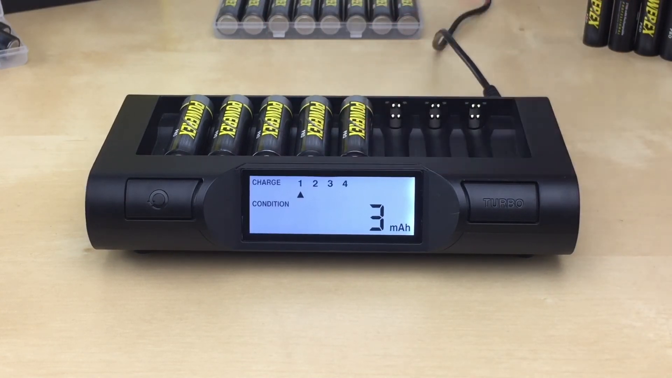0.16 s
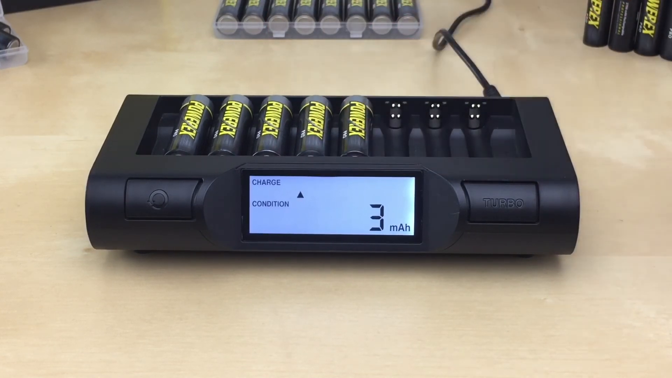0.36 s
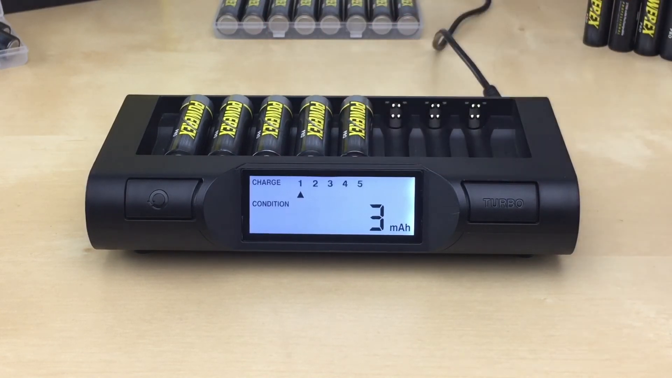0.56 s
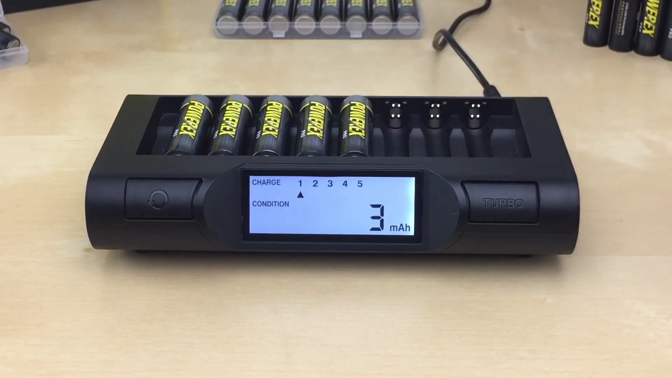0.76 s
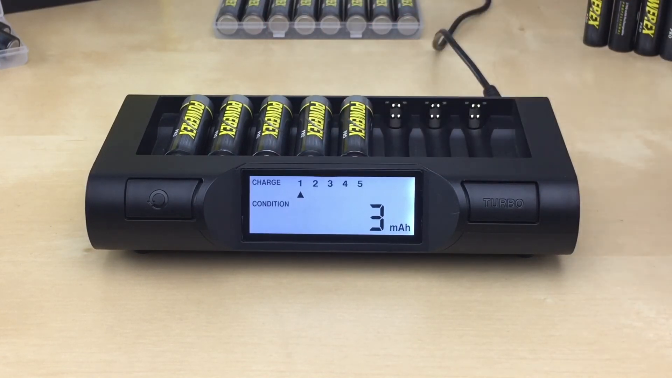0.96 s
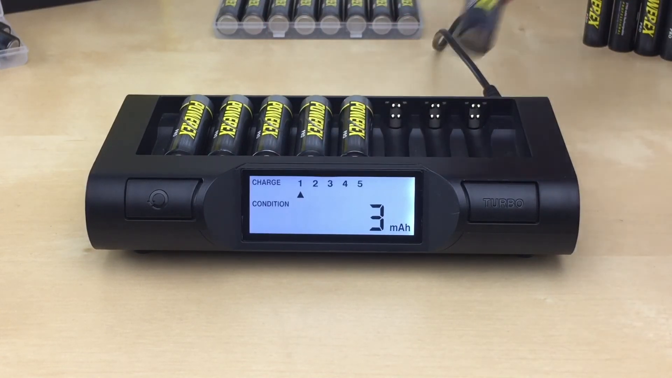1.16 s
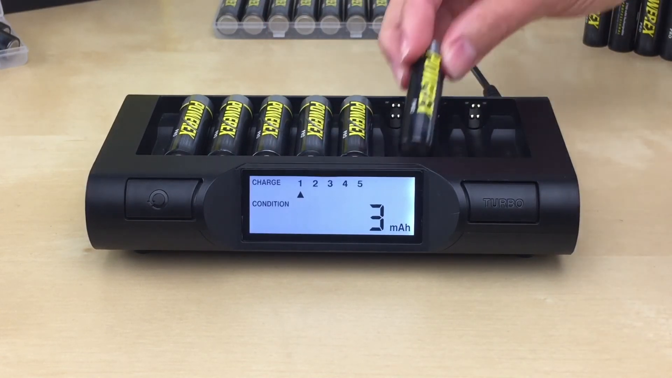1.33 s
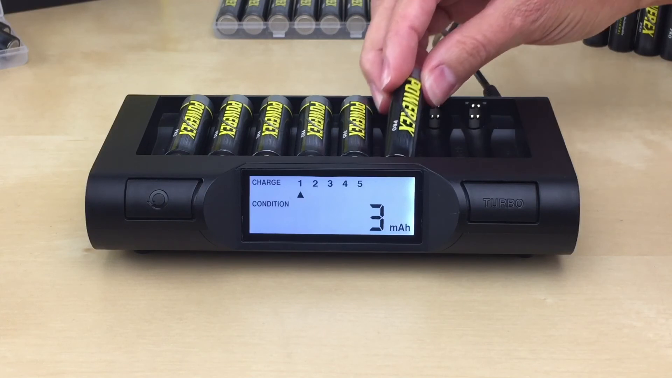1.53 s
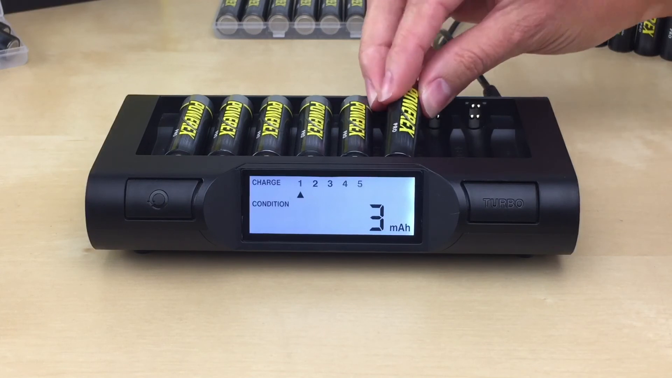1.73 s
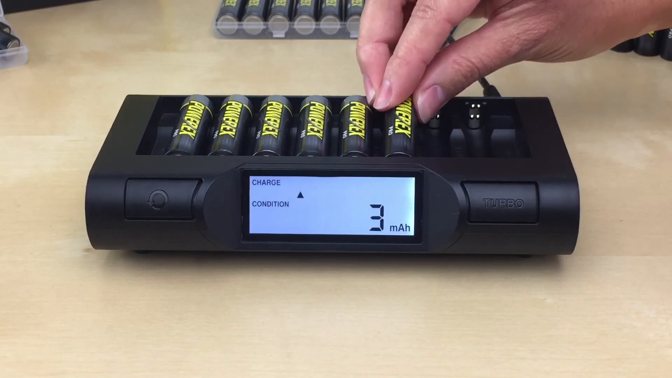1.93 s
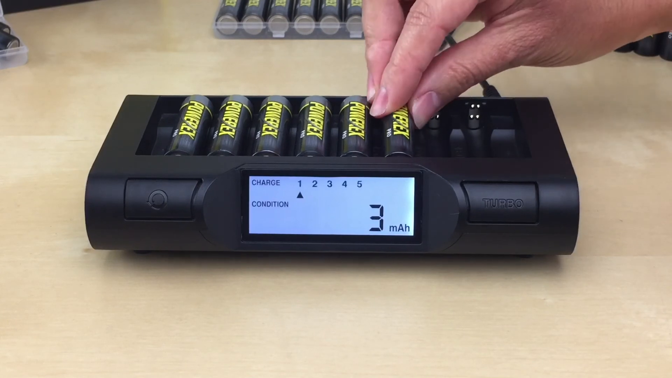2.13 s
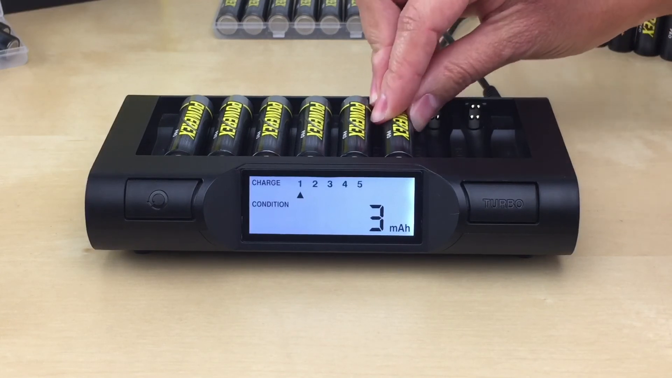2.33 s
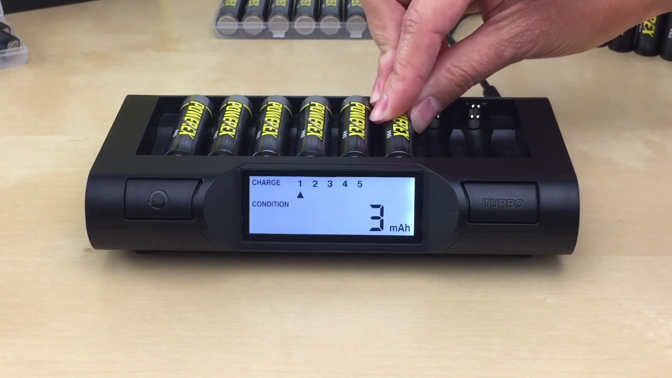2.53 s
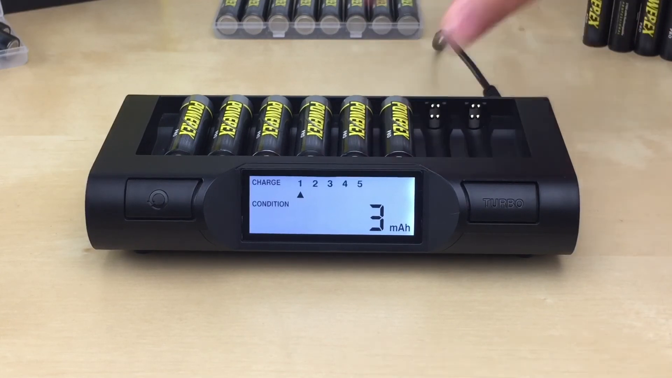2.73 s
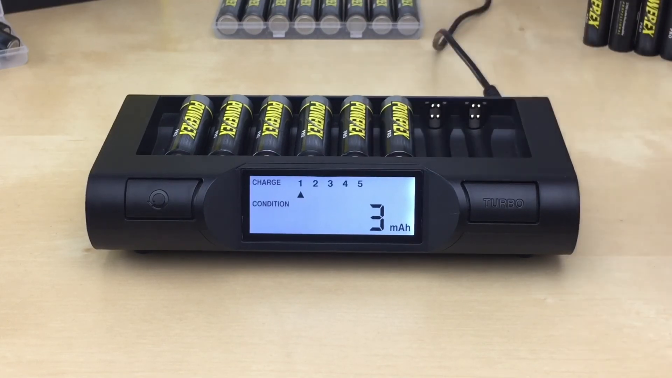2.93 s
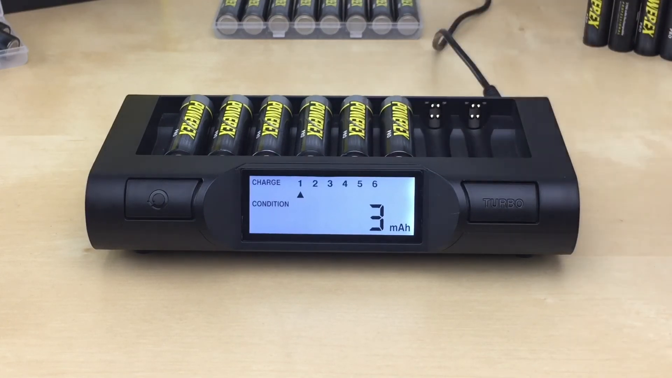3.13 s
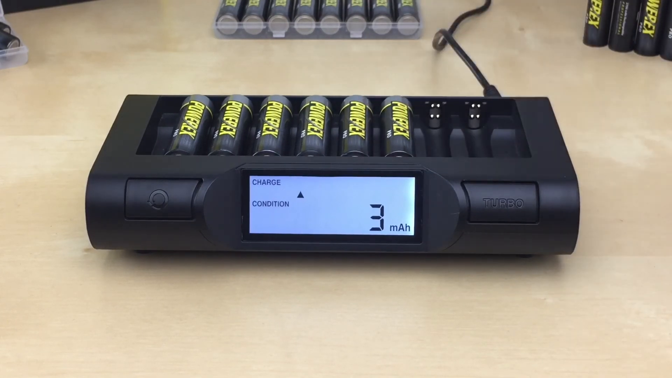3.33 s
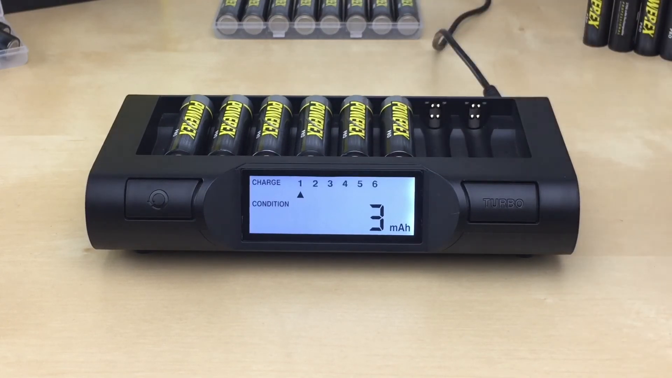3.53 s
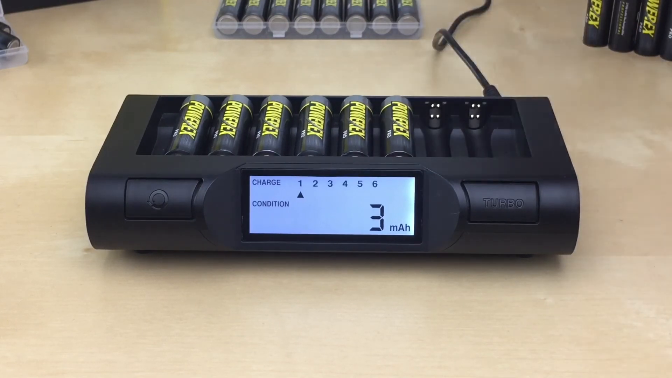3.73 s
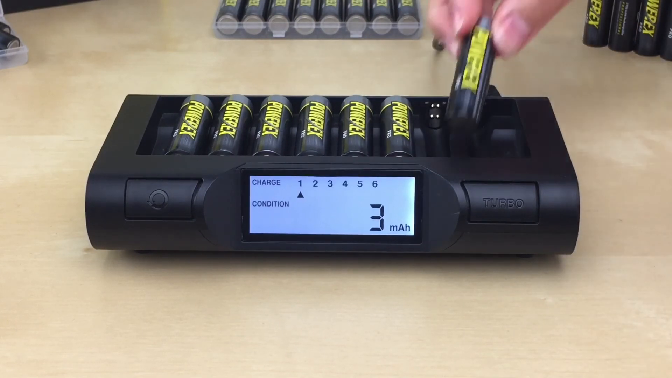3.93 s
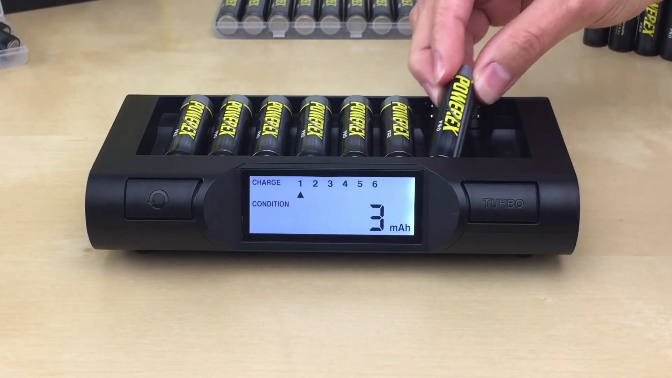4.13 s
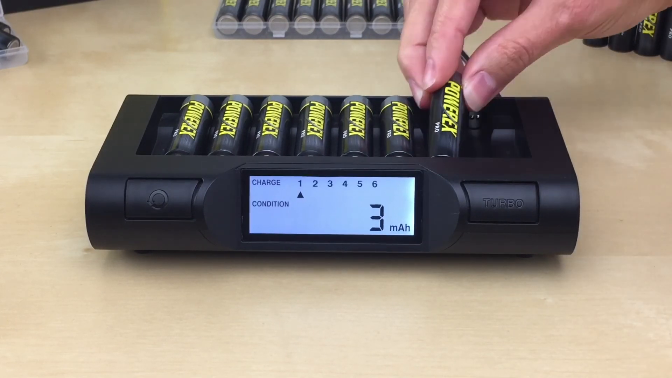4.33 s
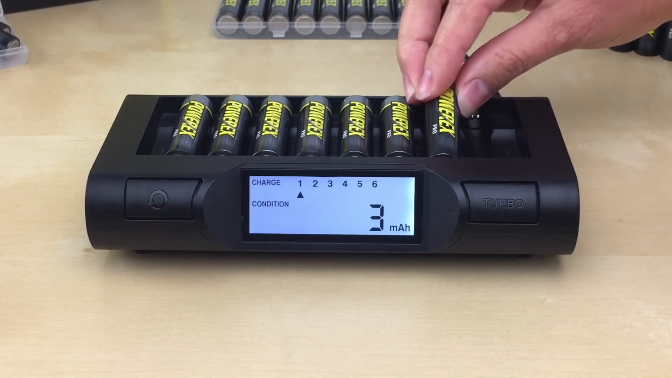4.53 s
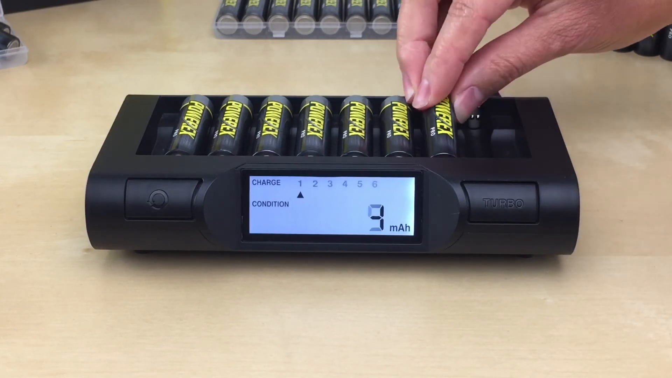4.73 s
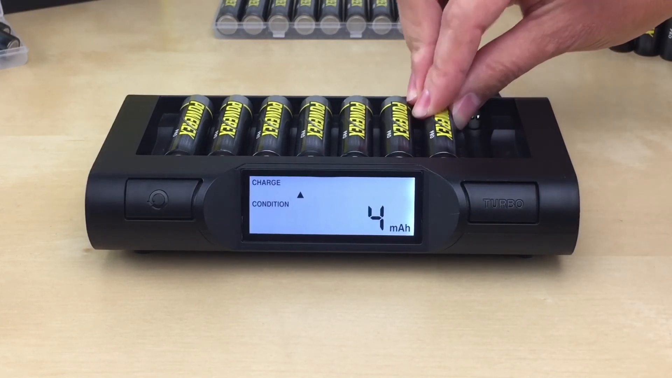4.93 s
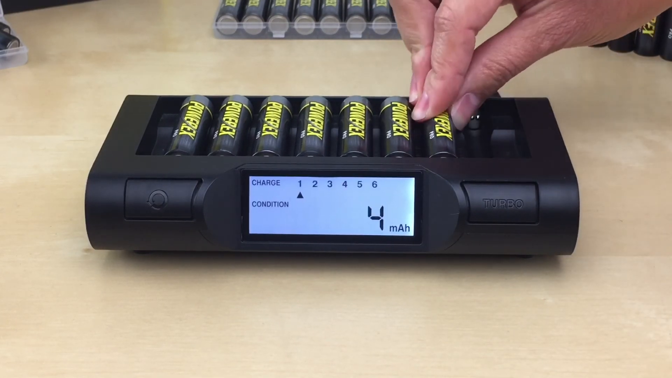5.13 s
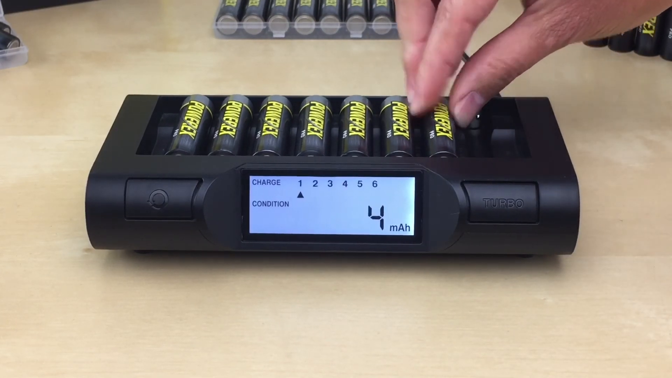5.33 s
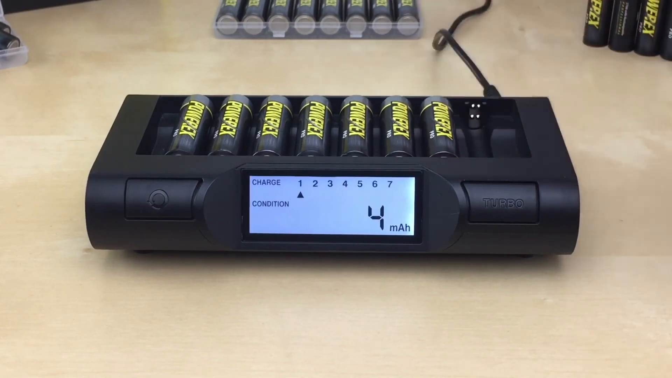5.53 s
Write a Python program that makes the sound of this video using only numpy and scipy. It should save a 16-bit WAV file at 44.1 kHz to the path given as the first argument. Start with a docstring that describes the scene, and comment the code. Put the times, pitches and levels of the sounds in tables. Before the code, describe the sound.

Close by in a quiet room, small batteries are pushed into a plastic charger on a wooden desk. After one sharp opening click, a battery knocks into its slot, rattles briefly and snaps past the spring contact. Following a pause, another goes in the same way, with a tiny metallic ping. The charger's cooling fan hums and whines faintly throughout.

```python
"""Sharp clicks and small thuds, close by in a quiet room: batteries pushed one by one into a plastic
charger on a wooden desk. Each cell knocks into its slot, scrapes past the spring contact and snaps
home; shell and spring ring with the clicks, the hollow case and the desk with the knocks.
Behind them the charger's little cooling fan hums and whines throughout, the whine swelling while
a hand rests over it, and the charging coils sing faintly."""
import sys
import numpy as np
from scipy import signal
from scipy.fft import rfft, irfft
from scipy.io import wavfile

SR = 44100
rng = np.random.default_rng(int(sys.argv[2]) if len(sys.argv) > 2 else 0)


def dump_mix(stems):
    """Bounce the given channels to the path in sys.argv[1] as a 16-bit WAV at rate SR."""
    frames = np.atleast_2d(stems).T  # one column per channel
    limited = np.clip(frames, -1, 1)  # hard clip at full scale
    pcm = np.round(limited * 32767).astype(np.int16)
    wavfile.write(sys.argv[1], SR, pcm)


N = 250488

# each cell's way into its slot, levels relative: landing t/s, rattle/dB, push start t/s, home t/s,
# friction at home/dB, spring ping/dB
CELLS = [(1.421, -28.5, 1.78, 2.275, -50.5, -46), (4.096, -39, 4.62, 5.009, -50.5, -35)]


def contact_clicks(shell_db, spring_db, edge_db):
    """A cell slips over the contacts: shell and spring ring, and each spot adds a note of its own."""
    # metal meets metal, levels relative: t/s, shell/dB, shell low cut/Hz, spring/dB, sharp edge/dB,
    # rise/ms, note f/Hz, note/dB
    contacts = [(0.159, -17.5, 1250, -20.5, -22.5, 0.075, 3370, -26),
                (1.422, -19, 950, -35, -54, 0.31, 3460, -33.5),
                (1.5112, -25, 800, -49, -64, 0.3, 3380, -54),
                (1.6156, -34.5, 800, -46.5, -36.5, 0.66, 10100, -52),
                (2.1540, -30, 500, -30, -23, 0.078, 7260, -36.5),
                (2.1566, -33, 500, -42, -34, .2, 4800, -37),
                (2.2740, -24.5, 550, -39.5, -37, 0.7, 4200, -43),
                (4.0950, -31.5, 700, -53, -66, .5, 2410, -42.5),
                (4.1912, -32.5, 1100, -37.5, -29.5, 0.13, 3900, -40),
                (4.6166, -33.5, 700, -45.5, -43, .5, 3000, -48),
                (4.8654, -40, 700, -35, -29.5, 1.5, 7140, -38), (4.984, -49, 705, -44, -62, 2.2, 6750, -50),
                (5.0044, -30.5, 600, -34, -41, 2.6, 4450, -40),
                (5.0140, -27, 500, -36.5, -47, 0.35, 3420, -40),
                (5.3784, -43, 700, -41.5, -28.5, .3, 6430, -43), (5.4, -58, 700, -52, -37, .3, 14900, -56)]
    # modes of the plastic shell and the metal spring: f/Hz, relative level/dB, t60/s
    shell_modes = [(597, -0.5, 0.024), (787, 10.5, 0.034), (855.5, 8, 0.019), (1050, 3.5, 0.016),
                   (1244, 5, 0.023), (1273, 4.5, 0.016), (1540, 1.5, 0.012), (1800, -1.5, 0.0085),
                   (2020, -6, 0.028), (2210, -3, 0.014), (2770, 1.5, 0.0018)]
    spring_modes = [(3030, -9, 0.02), (3640, -5.5, 0.023), (4476, 0.5, 0.014), (5420, 0, 0.0041),
                    (5800, 0, 0.0064), (6680, 1.5, 0.0039), (6900, 0, 0.0087), (7800, -4, 0.0029),
                    (9350, -0.5, 0.0023)]
    shell, spring, edge, notes = np.zeros((4, N))
    for s, shell_hit_db, low_cut_hz, spring_hit_db, edge_hit_db, rise_ms, note_hz, note_db in contacts:
        snap = chatter(rise_ms, spike_share=0.78)
        add(shell, s, from_db(shell_hit_db) * butter(snap, low_cut_hz, "high"))   # small, so little bass
        scrape = chatter(rise_ms, spike_share=0.1)
        add(spring, s, from_db(spring_hit_db) * scrape)
        add(edge, s, from_db(edge_hit_db) * scrape)
        add(notes, s, from_db(note_db) * metal_note(note_hz, rise_ms / 1000, t60=.014))
    plastic = from_db(shell_db) * body(shell, shell_modes)
    metal = from_db(spring_db) * butter(body(spring, spring_modes), 1200, "high")
    sizzle = from_db(edge_db) * butter(edge, (7600, 13500), "band")
    return plastic + metal + sizzle + notes


def chatter(rise_ms, spike_share):
    """Force of one contact: a spike, then a rattle of tiny impacts; a slow scrape loses the spike."""
    t_ms = np.linspace(0, 40, SR // 25)
    length_ms = 9.5 + 0.6 * rise_ms   # a slower contact rattles longer
    swell = (1 - np.exp(-t_ms / rise_ms)) * np.exp(-(t_ms / length_ms) ** 2)
    spectrum = rfft(rng.standard_normal(len(t_ms)) * swell)
    flat = spectrum / np.abs(spectrum)   # hard impacts carry all pitches evenly
    rattle = irfft(flat, len(t_ms)) * np.sqrt(swell)
    spike_energy = spike_share * np.exp(-rise_ms / 2)
    force = rattle * np.sqrt((1 - spike_energy) / np.sum(rattle ** 2))
    force[0] += np.sqrt(spike_energy)
    return force


def metal_note(hz, rise_s, t60):
    """A short metal ping that builds up as fast as the contact does."""
    t = np.arange(SR // 10) / SR
    return np.sin(2 * np.pi * hz * t) * (1 - np.exp(-t / rise_s)) * from_db(-60 * t / t60)


def spring_pings():
    """The loaded spring gives one longer note as a cell snaps home."""
    out = np.zeros(N)
    for _, _, _, home_s, _, ping_db in CELLS:
        add(out, home_s, from_db(ping_db) * metal_note(hz=4500, rise_s=0.0039, t60=0.049))
    return out


def desk_knocks(rub_db, rub_hz):
    """Knocks and friction pass through the hollow case and its rubber feet into the desk top."""
    # a cell knocks on the case, levels relative: t/s, desk ring/dB, overtones over that ring/dB,
    # thud on the feet/dB, rocking/dB, hollow clunk/dB
    cell_knocks = [(1.4219, -25.5, 1.5, -35, -59, -30.5), (1.513, -45, 12, -36.5, -52, -41.5),
                   (1.809, -43.5, 1.5, -50, -55, -48), (2.153, -35, -4.5, -36, -43, -34),
                   (2.274, -28.5, -6, -27.5, -35.5, -39), (4.096, -33.5, -11, -41, -56, -37),
                   (4.122, -51, 4, -50, -66, -41), (4.62, -40, -0.5, -41, -50, -40.5),
                   (5.003, -58.5, 6, -29.5, -38.5, -51)]
    # fingers nudge the charger: t/s, relative desk ring/dB
    nudges = [(0.110, -48), (1.618, -44.5), (2.100, -50), (2.364, -51), (2.726, -56), (4.181, -42),
              (4.344, -56), (4.851, -45), (5.113, -53.5), (5.416, -54.5)]
    # modes of the desk top, the case and the charger on its feet: f/Hz, relative level/dB, t60/s
    desk_modes = [(141.9, 4, 0.22), (214.8, -1, 0.41), (236.4, -18.5, 1), (262, -14, 0.28),
                  (340.5, -17.5, .16), (414, -19.5, 0.24)]
    case_modes = [(347, -9, 0.065), (440, -10.5, 0.065), (480, -5.5, 0.065), (583, -1.5, 0.097)]
    feet_modes = [(88.5, -4, 0.071), (119.7, 5, 0.053), (331, -15.5, 0.12)]
    hard_hz, soft_hz = 450, 227   # soft contacts shake only the low modes
    hard = [(*row, hard_hz) for row in cell_knocks]
    soft = [(s, db, -2, db - 5, db - 18, db - 12, soft_hz) for s, db in nudges]
    lowest, overtones, feet, rocking, case = np.zeros((5, N))
    for s, desk_db, overtones_db, thud_db, rock_db, clunk_db, hardness_hz in hard + soft:
        push = butter(signal.unit_impulse(SR // 20), hardness_hz, "low")
        add(lowest, s, from_db(desk_db) * push)
        add(overtones, s, from_db(desk_db + overtones_db) * push)   # set by where and how it lands
        add(feet, s, from_db(thud_db) * push)
        add(rocking, s, from_db(rock_db) * push)
        add(case, s, from_db(clunk_db) * push)
    friction = from_db(rub_db) * rubbing() * butter(rng.standard_normal(N), rub_hz, "low")
    wood = body(lowest + friction, desk_modes[:1]) - body(overtones + friction, desk_modes[1:])
    desk = from_db(-2.5) * butter(wood, 74, "high")
    charger = body(case + friction, case_modes) + body(feet, feet_modes) + ring(rocking, hz=53, t60=0.27)
    return butter(desk + charger, 35, "high", order=4)


def rubbing():
    """Friction envelope: a cell rattles to rest after landing, then drags ever harder until home."""
    rattle_rise_s, fall_db_per_s = .02, 151
    swell_db_per_s, hold_s = 20, 0.071
    t, out = np.arange(N) / SR, np.zeros(N)
    for land_s, rattle_db, push_s, home_s, push_db, _ in CELLS:
        age = np.maximum(t - land_s, 0)
        out += np.minimum(age / rattle_rise_s, 1) * from_db(rattle_db - fall_db_per_s * age)
        to_go = np.maximum(home_s - t, 0)
        out += held(push_s, home_s + hold_s, fade_s=.07) * from_db(push_db - swell_db_per_s * to_go)
    return out


def fan_air(rms_db):
    """Turbulence of the blades, coloured by the ducts of the case."""
    # spectrum of the rushing air: f/Hz, relative level/dB
    air_spectrum = [(20, -51), (40, -1), (70, 2), (150, -3), (300, -2.5), (450, -5.5), (1100, 6.5),
                    (1600, -1.5), (2600, -3.5), (3800, -11.5), (6000, -13.5), (7600, -19.5), (11000, -20.5),
                    (16000, -26)]
    # duct resonances: f/Hz, width/Hz, lift/dB
    ducts = [(734.8, 282, 17.5), (967.4, 22, 11), (1024, 73, 7), (1378, 86, 9), (2037, 240, 7),
             (3340, 1000, 1), (4140, 390, 4), (10370, 870, -4.5)]
    hz = np.fft.rfftfreq(N, 1 / SR)
    points_hz, points_db = np.transpose(air_spectrum)
    level_db = np.interp(np.log(hz + 1), np.log(points_hz), points_db)
    for centre_hz, width_hz, lift_db in ducts:
        level_db += lift_db * 2 ** -((2 * (hz - centre_hz) / width_hz) ** 2)
    rush = irfft(rfft(rng.standard_normal(N)) * from_db(level_db), N)
    return from_db(rms_db) * rms_one(rush)


def fan_tones(waver_db, jitter_hz):
    """Blades and bearing sing at multiples of the turning rate, wavering in the turbulent air."""
    # the fan's hum: multiple of the turning rate, rms level/dB
    hum = [(1, -72.5), (2, -83), (11, -59), (12.4, -82.5), (14, -79.5), (15, -79), (18, -75.5), (20, -76),
           (22, -80), (28, -85), (29.6, -84), (31, -82.5), (33, -90), (39.8, -84), (44.1, -92.5)]
    start_hz, sag_hz_per_s, whine_multiple = 112.9, .1, 19
    turning_hz = start_hz - sag_hz_per_s * np.arange(N) / SR + jitter_hz * wander(rate_hz=12)
    angle = 2 * np.pi * np.cumsum(turning_hz) / SR
    out = np.zeros(N)
    for multiple, db in [*hum, (whine_multiple, whine_level(base_db=-63.5, drift_db=1.8))]:
        gain = from_db(db + waver_db * wander(rate_hz=24))
        out += gain * np.sin(multiple * angle + 2 * np.pi * rng.random())
    return np.sqrt(2) * out


def whine_level(base_db, drift_db):
    """In dB: the reflection off a resting hand adds to the whine, and briefly cancels it on lifting."""
    # a hand rests over the charger: start t/s, end t/s, dip as it lifts away/dB
    hand_rests = [(-.4, .0, 15), (2.136, 2.597, 6), (4.94, 5.31, 4.5)]
    swell_db, dip_after_s, dip_width_s = 3.5, .2, .14
    t = np.arange(N) / SR
    level_db = base_db + drift_db * wander(rate_hz=6)
    for start_s, end_s, dip_db in hand_rests:
        lifting = np.exp(-((t - end_s - dip_after_s) / dip_width_s) ** 2)
        level_db += swell_db * held(start_s, end_s, fade_s=.04) - dip_db * lifting
    return level_db


def coils(width_hz):
    """The charging coils sing in thin, unsteady tones that come and go."""
    # coil tones: f/Hz, rms level/dB, start t/s, end t/s
    coil_tones = [(11714, -91, .4, 1.8), (14481, -93, 2.4, 5.68), (14481, -90, 4.4, 5.68)]
    out = np.zeros(N)
    for hz, db, start_s, end_s in coil_tones:
        tone = rms_one(butter(rng.standard_normal(N), [hz - width_hz / 2, hz + width_hz / 2], "band"))
        out += from_db(db) * tone * held(start_s, end_s, fade_s=.1)
    return out


def room(x, build_s):
    """Diffuse reflections in octave bands; the treble dies first."""
    # room tail: centre f/Hz, relative level/dB, t60/s
    bands = [(375, -9, 0.52), (734, -11, 0.19), (1580, -7, 0.13), (2950, -9.5, 0.15), (6600, -13, 0.12),
             (12500, -19, 0.092)]
    t = np.arange(SR // 2) / SR
    build_up = 1 - np.exp(-(t / build_s) ** 2)
    tail = np.zeros(len(t))
    for hz, db, t60 in bands:
        dying = rng.standard_normal(len(t)) * from_db(-60 * t / t60) * build_up
        octave = [hz / np.sqrt(2), hz * np.sqrt(2)]
        tail += from_db(db) * butter(dying / np.linalg.norm(dying), octave, "band")
    return signal.fftconvolve(x, tail)[:N]


def body(force, modes):
    """All modes of an object, neighbours swinging in opposite sense."""
    return sum((-1) ** k * from_db(db) * ring(force, hz, t60) for k, (hz, db, t60) in enumerate(modes))


def ring(force, hz, t60):
    """One mode: a unit click sets a sine of height 1 ringing."""
    decay, step = from_db(-60 / (t60 * SR)), 2 * np.pi * hz / SR
    return signal.lfilter([0, np.sin(step)], [1, -2 * decay * np.cos(step), decay ** 2], force + 1e-18)


def held(start_s, end_s, fade_s):
    """1 between two times, fading to 0 on either side."""
    return np.interp(np.arange(N) / SR, [start_s - fade_s, start_s, end_s, end_s + fade_s], [0, 1, 1, 0])


def wander(rate_hz):
    """Slow random drift with spread near 1."""
    knots = rng.standard_normal(1000)
    return np.interp(np.arange(N) / SR * rate_hz, np.arange(len(knots)), knots)


def from_db(db):
    """Decibels to gain."""
    return 10 ** (np.asarray(db) / 20)


def rms_one(x):
    """Scale to rms 1."""
    return x / np.sqrt(np.mean(x ** 2) + 1e-20)


def butter(x, hz, kind, order=2):
    """Causal Butterworth filter."""
    return signal.sosfilt(signal.butter(order, np.clip(hz, 10, .45 * SR), kind, fs=SR, output="sos"), x)


def add(track, s, sound):
    """Mix a sound into a track at time s."""
    start = round(s * SR)
    track[start:start + len(sound)] += sound[:N - start]


def scene():
    """Clicks and knocks with a touch of room, over a dry bed of fan and coils."""
    clicks = contact_clicks(shell_db=-12.0, spring_db=-9.0, edge_db=5.0)
    handling = clicks + spring_pings() + desk_knocks(rub_db=-33.5, rub_hz=437)
    bed = fan_air(rms_db=-52.5) + fan_tones(waver_db=2.12, jitter_hz=0.038) + coils(width_hz=42)
    return (handling + room(handling, build_s=.006) + bed)[None, :]


def record(dry):
    """The top is cut steeply."""
    cutoff_hz = 15900
    return signal.sosfilt(signal.ellip(12, .1, 70, cutoff_hz, fs=SR, output="sos"), dry)


dry = scene()
out = record(dry)
dump_mix(out)
```